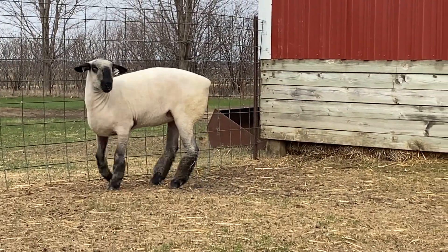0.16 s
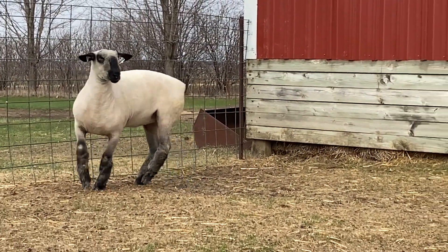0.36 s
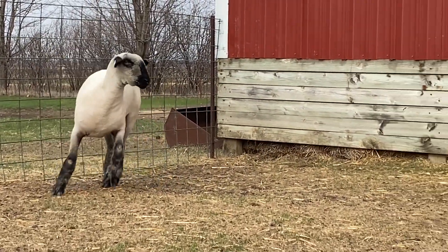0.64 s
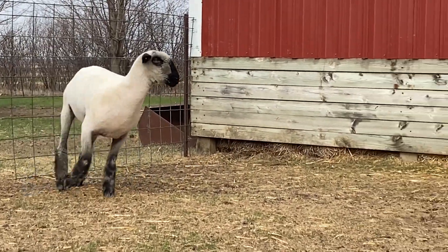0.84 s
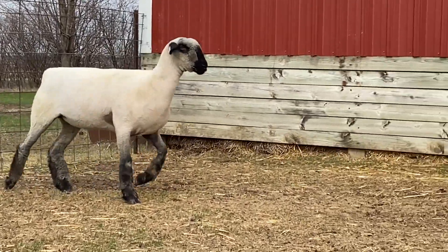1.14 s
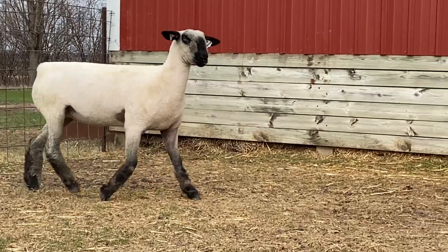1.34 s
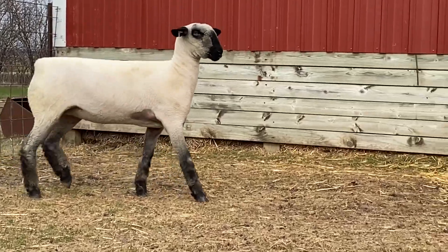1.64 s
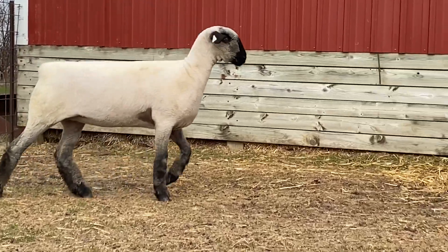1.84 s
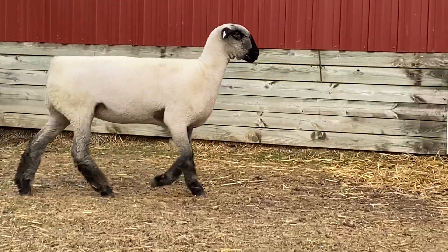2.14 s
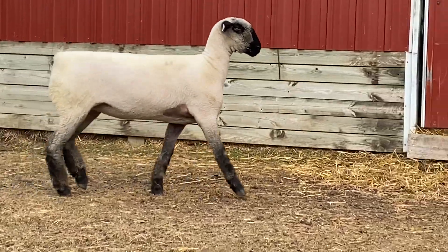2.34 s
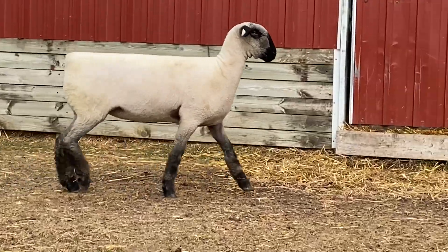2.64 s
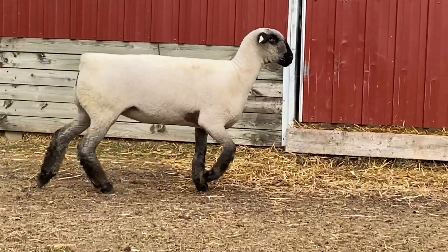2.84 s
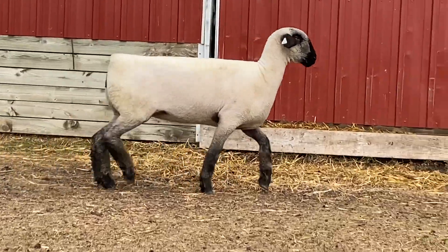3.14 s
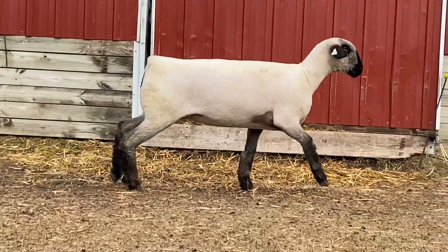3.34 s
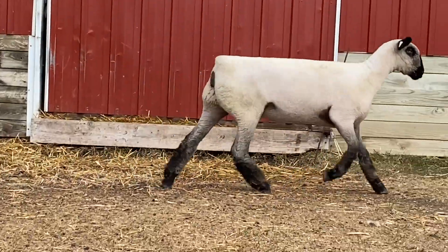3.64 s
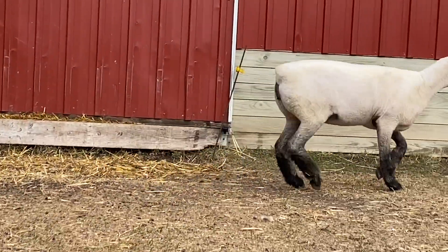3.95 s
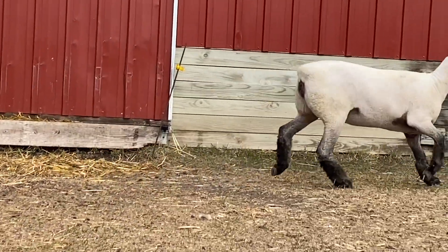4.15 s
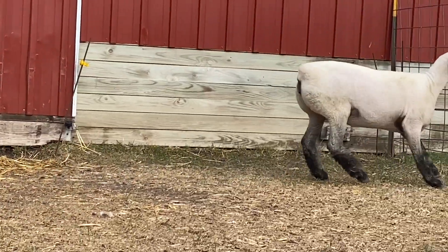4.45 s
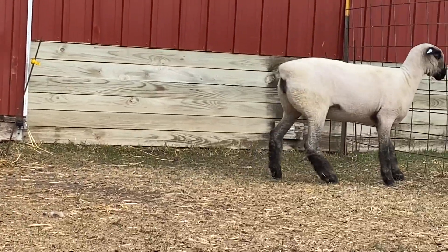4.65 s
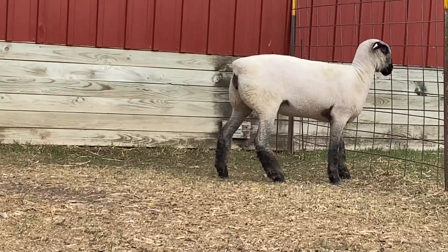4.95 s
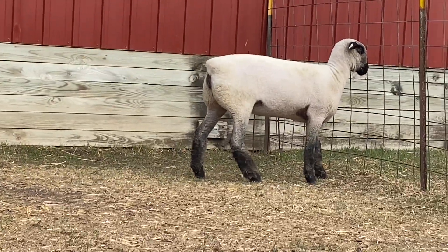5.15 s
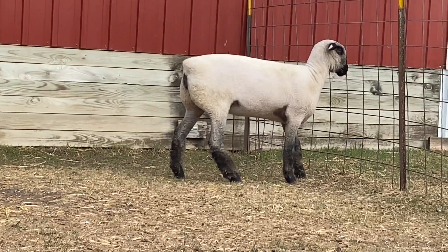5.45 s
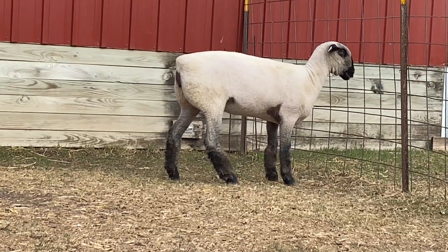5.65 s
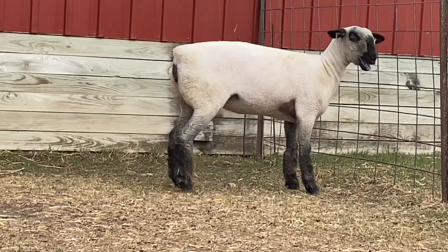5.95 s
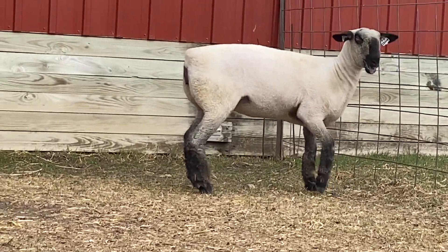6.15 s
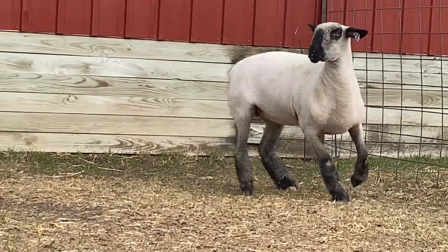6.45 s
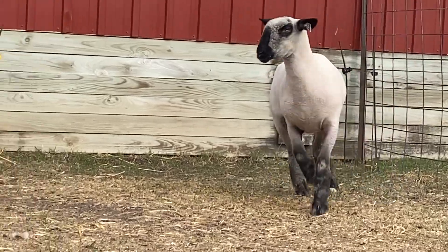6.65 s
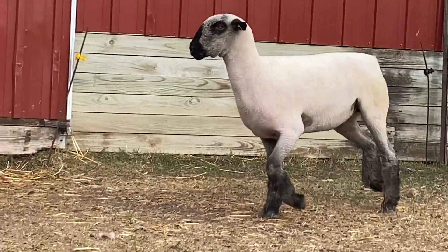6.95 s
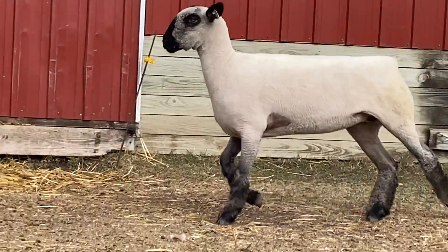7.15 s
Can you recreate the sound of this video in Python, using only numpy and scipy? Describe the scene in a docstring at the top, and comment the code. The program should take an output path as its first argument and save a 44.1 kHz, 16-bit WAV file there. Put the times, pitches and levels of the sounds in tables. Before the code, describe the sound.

Outdoors in a farm pen, a guinea fowl repeats a raspy two-note call about every 0.6 seconds, while a hoarser second one cackles irregularly. Wind rumbles and pops on the microphone throughout, worst near six seconds. Just then a sheep murmurs and opens into one short, quavering bleat; a tiny high chirp follows, and a higher lamb answers from farther off until the end.

```python
"""A farm pen on a windy day, heard at a pair of microphone ports. From the start two guinea fowl rasp,
the near one in two-note calls: syrinx vibrations mix into sum tones over breath noise. Gusts rumble, flutter
and pop at the ports as shaped noise and short bursts; thin clear notes, fowl-like or low, glide as sines.
Late on a sheep murmurs and opens into one quavering bleat, a bird chirps high, and a lamb answers from farther
off: vocal pulses and puffs of noise ring throats. Echoes of the yard and faint far air noise lie behind."""
import sys
import numpy as np
from scipy import signal
from scipy.fft import rfft, irfft, next_fast_len
from scipy.io import wavfile
from scipy.ndimage import uniform_filter1d

SR = 44100
rng = np.random.default_rng(int(sys.argv[2]) if len(sys.argv) > 2 else 0)


def unload_wav(signal):
    """Save mono or channel-first audio to the path in sys.argv[1] as 16-bit WAV at rate SR, clipped to [-1, 1]."""
    wavfile.write(
        sys.argv[1],
        SR,
        np.round(np.clip(np.atleast_2d(signal).T, -1, 1) * 32767).astype(np.int16),
    )


N = 321791

# Long notes of the near fowl: start_s, sum_tone_db, length_s, peak_effort_db
NEAR_LONG_NOTES = [(-.16, 0, 0.19, -26.5), (.46, -5, 0.19, -36), (1.07, 4.5, 0.2, -36.5),
                   (1.69, 0.5, 0.21, -35), (2.28, 3.5, 0.19, -35.5), (2.885, 1, 0.23, -33.5),
                   (3.482, 3.5, 0.23, -32), (4.098, 3.5, .2, -31), (4.68, 3.5, 0.21, -29.5),
                   (5.272, 0.5, 0.22, -30), (5.92, 6.5, 0.18, -29.5), (6.495, 1.5, 0.23, -28),
                   (7.12, 3, 0.21, -31)]
# Short notes of the near fowl: start_s, sum_tone_db, length_s, peak_effort_db, peak_at (share of note)
NEAR_SHORT_NOTES = [(.32, 0, 0.074, -40.5, 0.21), (.87, 0, 0.2, -43, 0.84), (1.53, -6, 0.22, -42, 0.78),
                    (2.14, 0, 0.068, -44, 0.53), (2.72, 2, 0.15, -41, 0.6), (3.355, 6, 0.13, -42.5, 0.32),
                    (3.952, 1, 0.15, -40, 0.2), (4.54, 0, 0.14, -38, 0.29), (5.145, -1, 0.12, -38, 0.31),
                    (6.365, 0, 0.14, -38, 0.23), (6.97, 1, 0.13, -37, 0.093)]
# Course of every long note: at (share of note), upper_hz, middle_hz, sum_hz, lock (0-1)
LONG_TUNE = [(0, 1395, 1681, 2500, 0.5), (.15, 1500, 1899, 2677, 0.12), (0.42, 1671, 1972, 2741, 0.09),
             (0.68, 1714, 1965, 2774, 0.16), (.705, 1713, 2253, 2882, 0.4), (.79, 1709, 2130, 2780, 0.48),
             (1, 1707, 2106, 2770, 0.15)]
# Course of every short note: same columns
SHORT_TUNE = [(0, 1521, 1850, 2634, 0), (.4, 1524, 1870, 2610, 0), (1, 1384, 1830, 2620, 0)]
# Effort along a long note: peak_at (share of note), start_db, end_db (both relative to the peak)
LONG_SWELL = 0.65, -14, -19
# Effort at the ends of a short note: start_db, end_db (relative to the peak)
SHORT_ENDS = -10, -23.5
# Notes of the second fowl: start_s, length_s, peak_effort_db, peak_at (share of note)
OTHER_NOTES = [(-.02, 0.3, -37, 0.047), (0.186, 0.15, -39, 0.33), (0.324, 0.15, -45, 1),
               (0.421, 0.42, -38, 0.5), (0.873, 0.3, -40, 0.16), (1.119, 0.23, -38.5, 0.32),
               (1.446, 0.26, -42.5, 0.2), (1.76, 0.23, -46.5, 0.47), (2.186, 0.33, -44, 0.84),
               (2.509, 0.19, -40, 0.2), (2.698, 0.17, -45.5, 0.83), (3.62, .18, -41, 0.42),
               (4.432, 0.2, -37, 0.55), (5.971, 0.29, -37, 0.7), (6.803, 0.26, -41.5, 0.18),
               (7.02, 0.18, -38, 0.55), (7.19, 0.14, -46, 0.67)]
OTHER_ENDS_DB = -9, -17.5  # at the start and end of its notes, relative to the peak
# Mixing tones of a syrinx: upper_multiple, lower_multiple, middle_multiple
TONES = [(0, 1, 0), (1, 0, 0), (0, 0, 1), (0, 2, 0), (1, 1, 0), (2, 0, 0), (0, 3, 0), (1, 2, 0), (2, 1, 0),
         (3, 0, 0), (1, 1, 1), (1, 3, 0), (2, 2, 0), (4, 0, 0), (3, 2, 0)]
# Balance of those tones in the long notes, the short notes and the second fowl: level_db
LONG_TONES = [-25, -0.5, 1, -37, 0, -2.5, -12.5, -15.5, -13.5, -35, -15, -15.5, -13.5, -11, -18.5]
SHORT_TONES = [-5.5, 3.5, 6, -27, 1.5, -11.5, -33, -40, -38, -27, -10, -23, -5.5, -36, -38]
OTHER_TONES = [-6, -8.5, 1.5, -7.5, -2.5, -3, -3.5, -5, -5, -23, -0.5, -1, -7.5, -51, -51]
# Breath spectrum of the near fowl and of the second: pitch_hz, level_db (per Hz)
NEAR_RASP = [(530, -60), (900, -25.5), (1670, -3.5), (2380, -8), (2760, -11), (3000, -13.5), (7040, -18.5),
             (9200, -28.5), (10000, -28.5), (15200, -35), (16500, -75)]
OTHER_RASP = [(530, -50), (900, -74), (1560, 3), (2160, -6), (2300, -4.5), (3690, -8), (4890, 1.5),
              (8980, -19.5), (11900, -25.5), (15200, -32), (16500, -55)]
NEAR_RASP_DB, OTHER_RASP_DB = -9, -4.5  # breath against tones
# Wandering resonances in the fowls' breath: pitch_hz, width_hz, level_db
BEAK = [(4136, 165, -11.5), (4870, 340, -13.5), (7000, 390, -22)]
RISE_BEND, FALL_BEND = 1.13, 1.18  # powers that round the top of a swell
JITTER, DRIFT = .025, .00805  # quick and slow straying of a syrinx, shares of pitch
SUM_LATE = .32  # the sum tone loses this share more of its dB when effort drops
LINGER = .31  # the upper side alone loses this share less of its dB when effort drops

YARD_T60_S, SHEEP_ECHO_DB, SIDES_DB = .24, -9, -8

# Course of the wind: time_s, rumble_db, bright_db (flutter over rumble)
WIND = [(0.0, -39.5, -18), (0.59, -30.5, -15), (0.61, -37, -14.5), (1.04, -43, -15.5), (1.08, -33, -16),
        (1.32, -53.5, -10), (1.38, -36.5, -18), (1.44, -45.5, -19), (1.56, -33.5, -20.5), (1.63, -41, -11),
        (1.68, -29, -17), (1.75, -43.5, -13), (2.11, -39.5, -12), (2.15, -32, -24), (2.19, -41, -18),
        (2.5, -46, -10), (2.54, -29.5, -19), (2.72, -50, -12), (2.84, -31.5, -11), (2.87, -34, -20),
        (2.92, -26, -26), (2.99, -40.5, -12), (3.05, -34.5, -12), (3.13, -35.5, -4), (3.19, -27.5, -13.5),
        (3.23, -34.5, -7.5), (3.33, -39, -9.5), (3.6, -47.5, -6.5), (3.7, -27, -9.5), (3.76, -37, -14),
        (3.78, -31.5, -14), (4.0, -40.5, -8.5), (4.19, -32.5, -16), (4.37, -47, -13), (4.43, -30.5, -8.5),
        (4.49, -44, -16), (4.59, -33, -13), (4.86, -38.5, -26), (4.88, -29, -22.5), (5.67, -34, -7),
        (5.77, -42.5, -8), (5.79, -28.5, -1), (5.85, -34, -10.5), (5.89, -41.5, -5), (6.04, -27.5, -6),
        (6.12, -31, -1), (6.14, -26, -5), (6.25, -27.5, -10.5), (6.32, -26.5, -9.5), (6.44, -27.5, -3.5),
        (6.52, -27.5, -9), (6.61, -40, -11), (6.67, -33, -16), (6.73, -70, -21), (6.85, -38, -11),
        (6.91, -44, -10), (6.99, -28.5, -5), (7.15, -42.5, -11.5), (7.26, -24, -4.5), (7.3, -29, -6)]
# Spectra of rumble, flutter and crackle: pitch_hz, level_db (per Hz)
RUMBLE = [(8.8, -33), (15, -44), (42, -0.5), (64, 5), (210, -7.5), (249, -13), (290, -19.5), (434, -41),
          (600, -65), (780, -74), (1320, -120)]
FLUTTER = [(60, 2), (150, 6.5), (300, 5.5), (500, -2.5), (750, -15), (1000, -39.5), (1500, -61)]
CRACKLE = [(300, -19), (600, 0), (900, 4.5), (1300, 1.5), (1800, -56)]
CALM_DB = -47  # the rumble never sinks below this
CRACKLE_DB = 18  # weight on the square of the flutter
FLARE_DB, FLARE_S = -19.5, .014  # flutter around a pop: rms under the pop's level, width scale
PORT_LAG = .45  # radians by which an eddy's lead at one port strays

# Spectrum of the far air: pitch_hz, level_db (per Hz)
AIR = [(350, -28), (550, -30), (800, -12), (1100, -6), (2040, -3), (2490, -5.5), (7970, -22.5),
       (11000, -26.5), (16500, -30)]
AIR_DB = -60.5

# Eddies bursting on a port: time_s, level_db, base_hz (scaled along the pop)
POPS = [(0.114, -28, 214), (0.287, -27, 190), (1.218, -27.5, 244), (1.64, -27.5, 344.5),
        (2.144, -17, 423.3), (2.886, -33, 221), (2.909, -27.5, 170), (3.03, -31, 201.3),
        (3.047, -31.5, 259.4), (3.091, -34, 330), (3.106, -25, 256), (3.181, -22.5, 175.7),
        (3.197, -25, 235.1), (3.266, -39, 560), (3.68, -23.5, 204), (3.751, -32, 491), (3.906, -27, 302),
        (4.086, -26.5, 208), (4.181, -30, 298), (4.257, -28.5, 203), (4.425, -29, 412), (4.524, -33, 330),
        (4.573, -28, 397), (4.621, -33, 295), (4.892, -33, 142), (4.963, -23, 243), (5.077, -26.5, 297),
        (5.328, -30, 428), (5.374, -26.5, 380), (5.49, -31, 283), (5.561, -30.5, 247), (5.646, -34, 310),
        (5.824, -21.5, 307), (5.847, -15.5, 357), (5.962, -15, 425), (5.993, -25, 400), (6.019, -15.5, 344),
        (6.149, -20, 300), (6.205, -25, 237), (6.268, -19, 328), (6.281, -28, 328), (6.312, -16, 463),
        (6.329, -29, 500), (6.34, -18.5, 302), (6.362, -21.5, 430), (6.381, -23.5, 417), (6.396, -30, 453),
        (6.41, -24.5, 530), (6.423, -25.5, 443), (6.437, -21.5, 480), (6.452, -29, 392), (6.484, -27, 327),
        (6.524, -33, 290), (6.648, -32, 237), (6.845, -28.5, 201), (6.945, -28, 410), (6.97, -25.5, 560),
        (7.011, -25, 265), (7.154, -24.5, 255), (7.208, -24.5, 477), (7.223, -18, 492), (7.239, -27.5, 743),
        (7.249, -28.5, 498)]
POP_TURN = .04  # turns by which a pop leads at one port and trails at the other
POP_CYCLES = .55, .8  # cycles in the quick middle of a pop: least, spread

# Thin clear notes (high bird chirps, piping fowl-like tones, low short tones):
# start_s, length_s, first_hz, middle_hz, last_hz, level_db
THIN_NOTES = [(6.42, .055, 2900, 3620, 3950, -51), (6.47, .055, 3950, 3550, 2850, -50.5),
              (6.44, .08, 3700, 4100, 3500, -55), (2.66, .045, 1110, 1043, 990, -50),
              (.96, .12, 2385, 2310, 2500, -50), (.13, .17, 1582, 1550, 1528, -44),
              (.42, .06, 1735, 1722, 1710, -48), (.855, .135, 1460, 1575, 1610, -47),
              (2.7, .06, 1607, 1618, 1630, -49), (6.76, .2, 575, 600, 610, -51),
              (7.1, .055, 600, 610, 600, -50), (1.36, .03, 1330, 1340, 1330, -57),
              (1.36, .035, 1130, 1150, 1120, -55)]
SHIVER = .013  # share of pitch by which a thin note strays

# Closed-mouthed start of the sheep: time_s, effort_db, pitch_hz, mouth (factor on the throat)
MURMUR = [(5.565, -56, 178, 0.93), (5.593, -44, 179, 0.94), (5.645, -51, 181.7, 0.98),
          (5.7, -42, 182, 0.98)]
# The sheep's open call: same columns
BLEAT = [(5.695, -41, 179.2, 1.2), (5.712, -33.5, 180.6, 1.0), (5.745, -28, 178.2, 0.93),
         (5.765, -32.5, 177.2, 1.02), (5.805, -26.5, 196.7, 0.96), (5.84, -30.5, 183, 1.08),
         (5.862, -24, 202.3, 1.015), (5.885, -28.5, 182.4, 1.01), (5.908, -32, 174.3, 1.06),
         (5.925, -27.5, 206.9, 1.01), (5.94, -22.5, 216.5, 1), (5.955, -26, 190.2, 0.987),
         (5.975, -37, 181.2, 1.03), (6.005, -30.5, 187.1, 1), (6.03, -31, 179.8, 1.02),
         (6.053, -37.5, 187.2, 1.0), (6.07, -30.5, 194, 0.96), (6.11, -38, 178.7, 1.2),
         (6.168, -26, 184.7, 1), (6.2, -46, 182, 0.93), (6.27, -52, 180.2, 0.97), (6.37, -51.5, 179.5, 1.0)]
# The lamb's answer: same columns
LAMB = [(6.68, -58, 278, 1), (6.744, -46.5, 275.5, 0.94), (6.838, -41, 277.5, 0.96),
        (7.2, -43.5, 280, 0.98)]
# Throat resonances of the closed sheep, the open sheep and the lamb: pitch_hz, width_hz, level_db
CLOSED_THROAT = [(726, 150, -22), (1125, 210, 3.5), (1510, 540, -9), (2010, 380, 3), (4800, 2700, -7.5),
                 (7560, 370, -16)]
SHEEP_THROAT = [(717, 205, -10.5), (1370, 410, -7), (1623, 196, -1.5), (2130, 390, -1), (2694, 98, -12),
                (2930, 1400, -14), (5060, 1100, -21.5), (7400, 4100, -27)]
LAMB_THROAT = [(616, 280, -6), (1230, 350, -4.5), (1557, 140, -6), (1895, 420, -6), (2252, 126, 1.5),
               (2590, 320, -4), (4500, 2700, -5.5)]
# Quaver of the sheep: rate_hz, depth_db, turns to the first swell
SHEEP_QUAVER = 13.8, .5, .55
# How strongly the throat rings near SING_HZ: time_s, level_db
SING = [(5.7, -2.5), (5.78, -2), (5.81, 3), (5.855, 1), (5.885, 5.5), (5.93, 9), (5.96, 4), (6.0, 1),
        (6.04, 0), (6.07, 1), (6.12, 0), (6.17, -7.5), (6.3, 0)]
SING_HZ = 1620
SHEEP_ROUGH, MURMUR_ROUGH, LAMB_ROUGH = .29, .7, .55  # share of noise at SING_HZ
ROUGH_SLOPE = .8  # power by which the share of noise grows with pitch of the resonance
FOLD_JITTER, FOLD_SHIMMER_DB = .034, 2.4  # straying of the pulses: share of pitch, level
PUFF_FLOOR, PUFF_SHARE = .3, .45  # breath between puffs, share of a cycle in which a puff decays
MOUTH_WAVER = .009  # share of throat tuning

# Phase between the microphone ports: pitch_hz, lead of the left (radians)
PORT_TURN = [(20, -.95), (520, -.9), (780, .4), (1720, .55), (2600, .35), (4200, .12), (8000, -.1),
             (8800, -3.14), (9500, -3.3), (10400, -5.9), (11600, -6.4), (12700, -9.2), (13700, -9.5),
             (14600, -12.3), (16500, -12.8)]
EDGE_HZ = 15800
LEFT_RIGHT = np.array([[1], [-1]])  # opposite signs at the two ports


def gain_of(db):
    """Amplitude factor of a level in dB."""
    return 10 ** (np.asarray(db) / 20)


def evened(x):
    """Scales a sound to an rms of one."""
    return x / np.sqrt(np.mean(x ** 2) + 1e-20)


def read(points, hz):
    """Reads a curve over frequency, straight on a logarithmic axis."""
    f, value = np.transpose(points)
    return np.interp(np.log(hz + 1), np.log(f + 1), value)


def add(mix, s, sound):
    """Lays a sound into the mix at s seconds, cut at both ends of the mix."""
    at = round(s * SR)
    sound = sound[..., max(-at, 0):]
    part = mix[..., max(at, 0):][..., :sound.shape[-1]]
    part += sound[..., :part.shape[-1]]


def played(rows):
    """Start time and the columns of a curve table, sample by sample."""
    s, *columns = np.transpose(rows)
    t = np.arange(s[0], s[-1], 1 / SR)
    return s[0], [np.interp(t, s, c) for c in columns]


def coloured(x, points):
    """Filters x by a spectrum and evens its level."""
    size = next_fast_len(x.shape[-1])
    gains = gain_of(read(points, np.fft.rfftfreq(size, 1 / SR)))
    return evened(irfft(rfft(x, size) * gains, size)[..., :x.shape[-1]])


def wobble(count, seconds):
    """Smooth chance of rms one that changes within the given time."""
    size = max(round(seconds * SR), 1)
    return evened(uniform_filter1d(uniform_filter1d(rng.standard_normal(count), size), size))


def resonate(x, hz, width):
    """A moving resonance: shifts the curve hz down to zero, smooths twice, and shifts back."""
    turn = np.exp(2j * np.pi * np.cumsum(hz * np.ones(len(x))) / SR)
    r = np.exp(-np.pi * width / SR)
    once = signal.lfilter([1 - r], [1, -r], x / turn + 1e-18)
    return 2 * (turn * signal.lfilter([1 - r], [1, -r], once)).real


def swell(length, peak_db, peak_at, start_db, end_db):
    """Share of a note gone by, and its effort: a rise to the peak and a fall from it."""
    share, peak_at = np.linspace(0, 1, round(length * SR)), np.clip(peak_at, .05, .95)
    before = np.maximum(1 - share / peak_at, 0)
    after = np.maximum((share - peak_at) / (1 - peak_at), 0)
    return share, peak_db + start_db * before ** RISE_BEND + end_db * after ** FALL_BEND


def syrinx(effort_db, upper_hz, lower_hz, middle_hz, tones_db, rasp, rasp_db, lock, sum_db):
    """Three unsteady vibrations mix into sum tones over breath noise; high tones vary less with effort."""
    n = len(effort_db)
    drop_db = effort_db.max() - effort_db
    turns = []
    for hz in (upper_hz, lower_hz, middle_hz):
        stray = 1 + JITTER * wobble(n, .00249) + DRIFT * wobble(n, .04)
        turns.append(np.cumsum(hz * stray) / SR + rng.random())
    tones = np.zeros(n)
    for (a, b, c), db in zip(TONES, tones_db):
        level_db = db + 5.65 * np.minimum(wobble(n, .021), 1)
        level_db = level_db + .038 * (a + b + c + .5) * drop_db
        level_db = level_db + lock * (-2 - 25 * a)  # lock hushes the upper side
        if (a, b, c) == (1, 0, 0):
            level_db = level_db + LINGER * drop_db
        if (a, b, c) == (1, 1, 0):
            level_db = level_db + sum_db - SUM_LATE * drop_db
        tones += gain_of(level_db) * np.cos(2 * np.pi * (a * turns[0] + b * turns[1] + c * turns[2]))
    hiss = rng.standard_normal(n)
    breath = coloured(hiss, rasp)
    for hz, width, db in BEAK:
        ring = evened(resonate(hiss, hz * (1 + .033 * wobble(n, .049)), width))
        breath = breath + gain_of(db + 3.2 * wobble(n, .014)) * ring
    breath = breath * gain_of(1.73 * wobble(n, .018))
    mix = (evened(tones) + gain_of(rasp_db) * breath) / np.sqrt(1 + gain_of(2 * rasp_db))
    return gain_of(effort_db) * mix * signal.windows.tukey(n, .2)


def near_fowl():
    """Long and short syrinx notes; late in a long one the middle tone jumps up and the upper side hushes."""
    out = np.zeros(N)
    for notes, rule, tune, tones_db in (
            (NEAR_LONG_NOTES, LONG_SWELL, LONG_TUNE, LONG_TONES),
            (NEAR_SHORT_NOTES, SHORT_ENDS, SHORT_TUNE, SHORT_TONES)):
        at, *curves = np.transpose(tune)
        for s, sum_db, *note in notes:
            share, effort_db = swell(*note, *rule)
            upper_hz, middle_hz, sum_hz, lock = (np.interp(share, at, c) for c in curves)
            add(out, s, syrinx(effort_db, upper_hz, sum_hz - upper_hz, middle_hz, tones_db,
                               NEAR_RASP, NEAR_RASP_DB, lock, sum_db))
    return out


def other_fowl():
    """A hoarser, brighter bird whose three syrinx vibrations wander about steady pitches."""
    out = np.zeros(N)
    for s, *note in OTHER_NOTES:
        _, effort_db = swell(*note, *OTHER_ENDS_DB)
        n = len(effort_db)
        upper_hz, lower_hz, middle_hz = (hz * (1 + .025 * wobble(n, .05)) for hz in (1580, 1140, 1950))
        add(out, s, syrinx(effort_db, upper_hz, lower_hz, middle_hz, OTHER_TONES,
                           OTHER_RASP, OTHER_RASP_DB, 0, 0))
    return out


def yard(x, t60, start_s):
    """Sparse echoes off barn walls and ground: random taps of either sign that die away."""
    t = np.arange(SR // 2) / SR
    taps = rng.choice([-1., 1.], len(t)) * (rng.random(len(t)) < .05)
    taps = taps * gain_of(-60 * t / t60) * (t > start_s)
    return signal.fftconvolve(x, taps / np.linalg.norm(taps))[:N]


def wind():
    """Lumpy rumble and puffing flutter that crackles when strong; each eddy's lead strays between ports."""
    _, curves = played(WIND)
    rumble_db, bright_db = (np.append(c, [c[-1]] * SR)[:N] for c in curves)
    rumble_db = 10 * np.log10(gain_of(2 * rumble_db) + gain_of(2 * CALM_DB))
    lumps, puffs = wobble(N, .022), wobble(N, .013)
    rumble = evened(coloured(rng.standard_normal(N), RUMBLE) * gain_of(2.5 * lumps))
    puffed = rng.standard_normal(N) * gain_of(1.8 * lumps + 3.7 * np.minimum(puffs, 1.4))
    t = np.arange(N) / SR
    flares = sum(gain_of(db + FLARE_DB) * 2 / (2 + ((t - s) / FLARE_S) ** 4) for s, db, _ in POPS)
    strength = gain_of(rumble_db + bright_db) + flares
    # the flares around pops count only about half towards the crackle
    crackle = gain_of(CRACKLE_DB) * (strength - .49 * flares) ** 2 * coloured(puffed, CRACKLE)
    gust = gain_of(rumble_db) * rumble + strength * coloured(puffed, FLUTTER) + crackle
    lag = PORT_LAG * wobble(N, .12) * LEFT_RIGHT
    ports = (signal.hilbert(gust, next_fast_len(N))[:N] * np.exp(1j * lag)).real
    return ports * gain_of(1.1 * wobble(N, .023) * LEFT_RIGHT)


def air():
    """Faint far noise of the farm, coloured and slightly wavering."""
    waver_db = 2.2 * wobble(N, .034)
    return gain_of(AIR_DB + waver_db) * coloured(rng.standard_normal(N), AIR)


def pops():
    """An eddy bursting on a port: a few cycles, quickest in the middle."""
    out, t = np.zeros((2, N)), np.arange(-900, 900) / SR
    least, spread = POP_CYCLES
    for s, db, hz in POPS:
        phase, side, chance = rng.random(3)
        cycles = least + spread * chance ** 2
        quick = np.cumsum(hz * (.303 + 1.195 * np.exp(-(t * hz / cycles) ** 2))) / SR
        lead = POP_TURN * np.sign(side - .5) * LEFT_RIGHT
        burst = np.exp(-np.abs(t / .0068) ** 1.35) * np.cos(2 * np.pi * (quick + phase + lead))
        add(out, s + .00288 + t[0], gain_of(db) * burst)
    return signal.sosfiltfilt(signal.butter(2, 1800, fs=SR, output="sos"), out)


def thin_notes():
    """Thin clear notes: sine glides, each a smooth bow through three pitches."""
    out = np.zeros(N)
    for s, length, first_hz, middle_hz, last_hz, db in THIN_NOTES:
        u = np.linspace(-1, 1, round(length * SR))
        bow_hz = (first_hz + last_hz) / 2 - middle_hz
        hz = middle_hz + (last_hz - first_hz) / 2 * u + bow_hz * u ** 2
        hz = hz * (1 + SHIVER * wobble(len(u), .0013))
        flutter_db = 3 * wobble(len(u), .0036)
        tone = np.sqrt(2) * np.sin(2 * np.pi * np.cumsum(hz) / SR)
        add(out, s, gain_of(db + flutter_db) * tone * signal.windows.tukey(len(u), .3))
    return out


def bleat(rows, throat, rough, quaver_hz, quaver_db, turn):
    """Uneven vocal pulses and puffs of noise excite throat resonances; pitch and level quaver together."""
    s, (effort_db, hz, mouth) = played(rows)
    n = len(hz)
    t = np.arange(n) / SR
    quaver = np.cos(2 * np.pi * (quaver_hz * t - turn))
    sing_db = np.interp(s + t, *np.transpose(SING))
    turns = np.cumsum(hz * (1 + FOLD_JITTER * wobble(n, .006) + .019 * quaver)) / SR
    folds = sum(np.cos(2 * np.pi * k * turns) for k in range(1, 40))
    folds = evened(folds * gain_of(FOLD_SHIMMER_DB * wobble(n, .0039)))
    puffs = evened((PUFF_FLOOR + np.exp(-(turns % 1) / PUFF_SHARE)) * rng.standard_normal(n))
    voice = np.zeros(n)
    for k, (f, width, db) in enumerate(throat):
        noise_share = np.clip(rough * (f / SING_HZ) ** ROUGH_SLOPE, 0, 1)
        drive = (1 - noise_share) * folds + noise_share * puffs
        ring = evened(resonate(drive, f * (mouth + MOUTH_WAVER * wobble(n, .018)), width))
        nearness = np.exp(-(np.log(f / SING_HZ) / .076) ** 2)
        voice += (-1) ** k * gain_of(db + sing_db * nearness) * ring  # neighbours alternate in sign
    out = np.zeros(N)
    voice = evened(voice * gain_of(quaver_db * quaver))
    add(out, s, gain_of(effort_db) * voice * signal.windows.tukey(n, .04))
    return out


def sheep():
    """A closed-mouthed murmur that runs into the open bleat."""
    murmur = bleat(MURMUR, CLOSED_THROAT, MURMUR_ROUGH, *SHEEP_QUAVER)
    return murmur + bleat(BLEAT, SHEEP_THROAT, SHEEP_ROUGH, *SHEEP_QUAVER)


def lamb():
    """A higher voice from farther off, with a slower quaver."""
    return bleat(LAMB, LAMB_THROAT, LAMB_ROUGH, quaver_hz=9., quaver_db=.54, turn=.11)


def scene():
    """Animals with their echoes and the far air in the middle, side echoes, and wind at each port."""
    calls = near_fowl() + other_fowl()
    middle = calls + gain_of(-5.5) * yard(calls, YARD_T60_S, .0072) + air()
    close = thin_notes() + sheep()
    middle = middle + close + gain_of(SHEEP_ECHO_DB) * yard(close, YARD_T60_S, .007)
    far = lamb()
    middle = middle + gain_of(-3.5) * (far + yard(far, .97, .0074))  # long, strong echo for distance
    # echoes from the sides reach the ports unlike, only below the treble
    below_treble = signal.butter(6, 1900, fs=SR, output="sos")
    sides = signal.sosfilt(below_treble, yard(middle, .071, .00044))
    return middle + gain_of(SIDES_DB) * sides * LEFT_RIGHT + wind() + pops()


def record(dry):
    """The paths to the two ports differ, which turns the phase between them; then the band limit."""
    size = next_fast_len(N)
    lead = read(PORT_TURN, np.fft.rfftfreq(size, 1 / SR))
    turn = np.exp(.5j * lead * LEFT_RIGHT)  # half the lead to each port
    ports = irfft(rfft(dry, size) * turn, size)[:, :N]
    band = signal.firwin(511, EDGE_HZ, window=("kaiser", 9), fs=SR)
    return signal.oaconvolve(ports, band[None], "same")


dry = scene()
out = record(dry)
unload_wav(out)
```